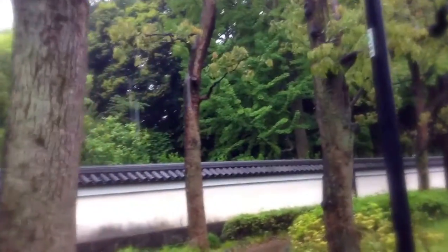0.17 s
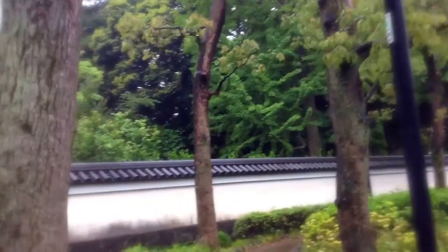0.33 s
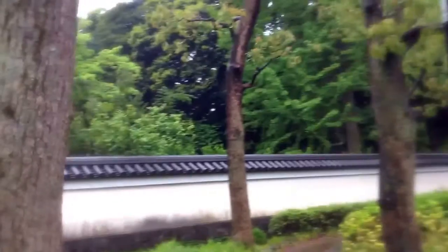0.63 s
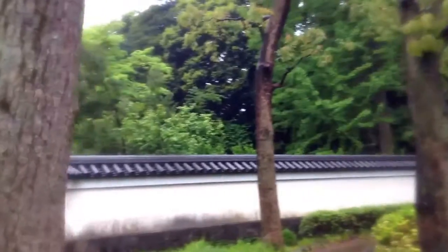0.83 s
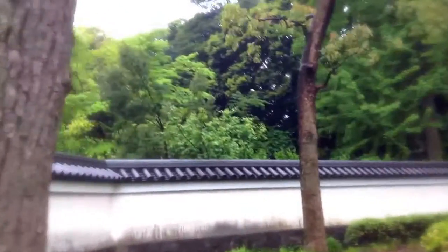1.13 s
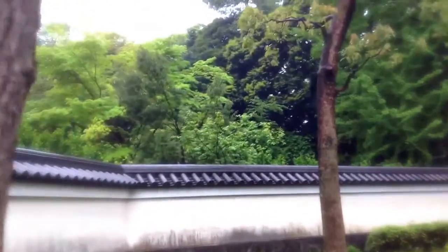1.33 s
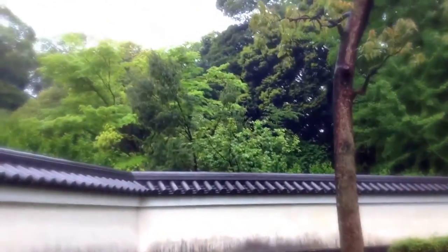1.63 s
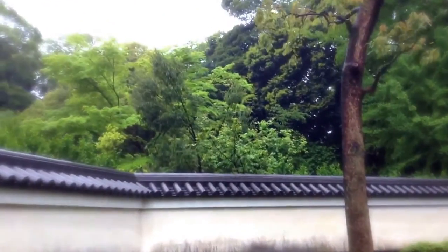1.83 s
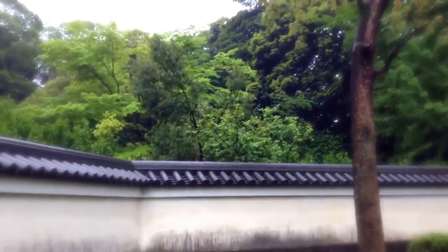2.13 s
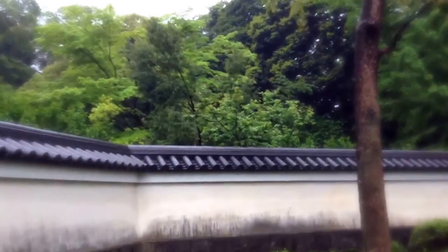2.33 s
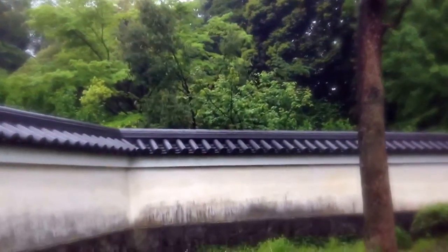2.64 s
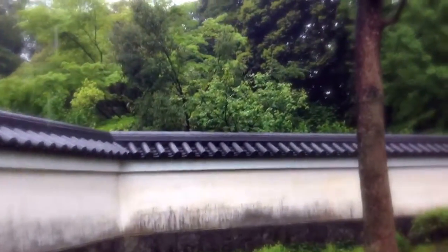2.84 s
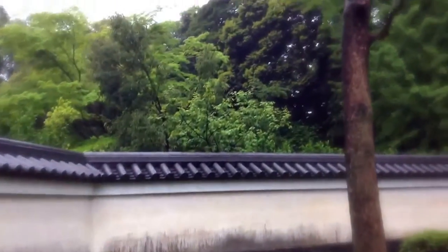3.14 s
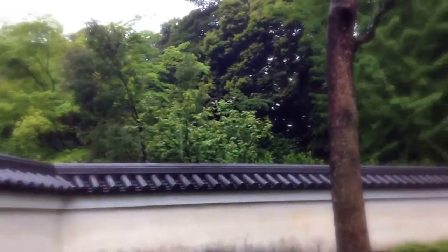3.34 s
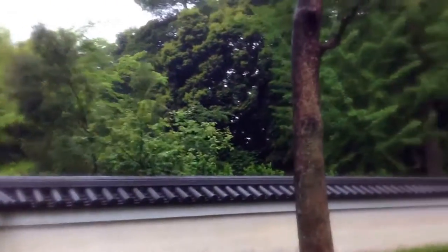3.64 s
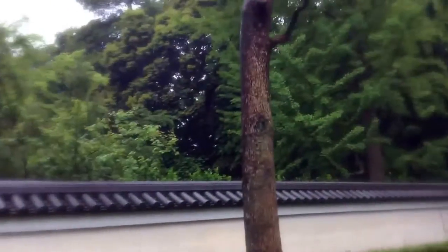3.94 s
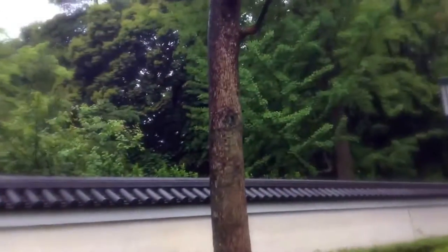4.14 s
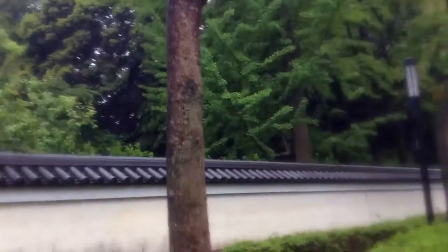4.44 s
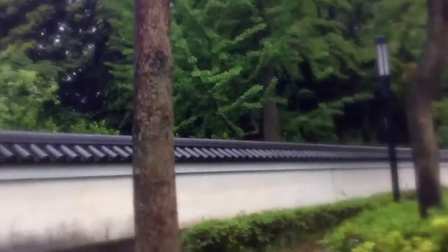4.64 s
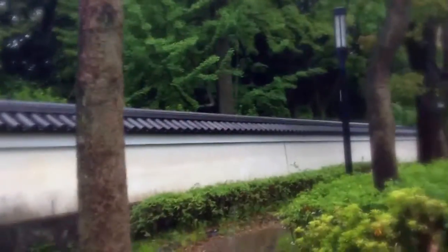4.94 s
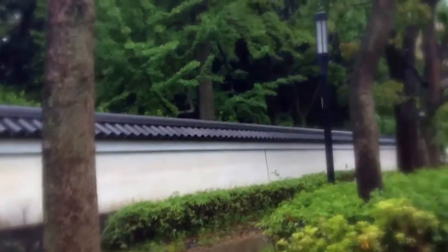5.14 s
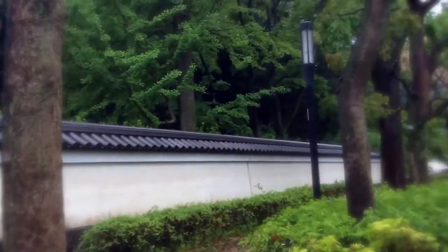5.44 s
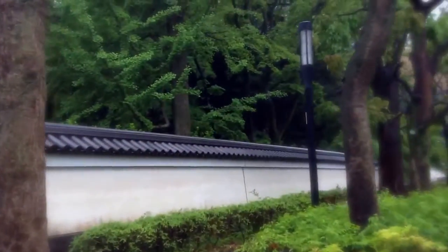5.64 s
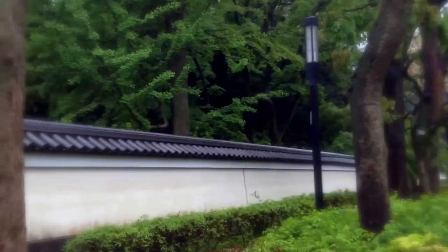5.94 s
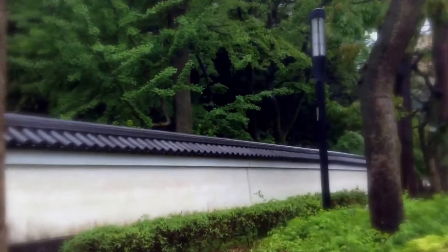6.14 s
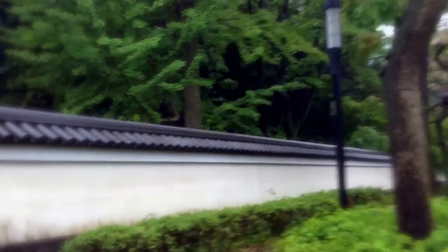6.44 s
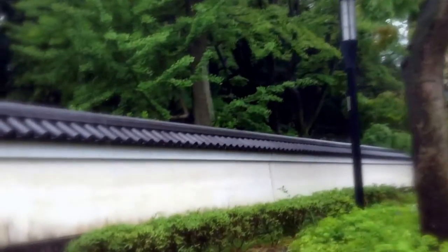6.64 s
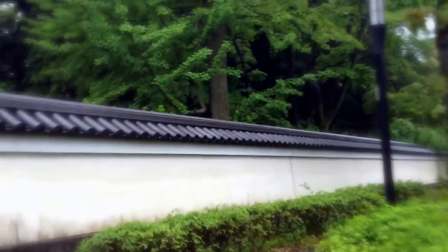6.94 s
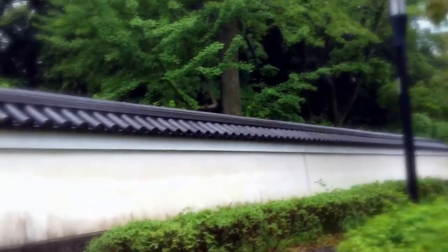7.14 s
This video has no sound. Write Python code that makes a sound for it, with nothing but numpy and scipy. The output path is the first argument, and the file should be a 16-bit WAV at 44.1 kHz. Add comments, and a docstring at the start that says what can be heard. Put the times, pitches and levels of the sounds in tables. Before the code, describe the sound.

Rain is already falling steadily at 0 s in a wooded garden, heard under an umbrella through a muffled, dark-sounding microphone. Low, slightly ringing cloth drumming sits beneath a soft midrange wash of distant plops and a quieter patter of ticks, splats and tiny plinks on leaves. A rounded bump thuds on the cloth near 0.55 s; faint bright splashes come around 0.75 and 1.1 s. The shower slowly builds, with softer bumps or drips near 2.5, 3.05 and 3.3 s. At 3.6 s a very loud, hard drip knocks right by the microphone, another at 3.93 s, and the rain ducks then creeps back. More knocks follow from 4.3 s, thickest from 5 to 6 s, uneven, hollow and clacking, with strong ones near 5.3, 5.5 and 5.86 s. The last falls about 6.02 s; fuller rain recovers and continues to 7.3 s, with one faint bump near 6.8 s.

```python
"""Steady rain in a wooded garden, heard through a muffled microphone from under an umbrella.
From the start drops drum on the ringing cloth, shaped noise and far plops make a wash, and short grains
and spray patter on leaves; soft bumps and bright splashes stand out, and the shower slowly builds.
Midway, fat drips knock right by the microphone, thickest between five and six seconds, each a push and
rebound through a resonant case; a limiter ducks the rain under them and slowly lets it back."""
import sys
import numpy as np
from scipy import signal
from scipy.fft import rfft
from scipy.io import wavfile
from scipy.ndimage import uniform_filter1d, minimum_filter1d

SR = 44100
rng = np.random.default_rng(int(sys.argv[2]) if len(sys.argv) > 2 else 0)


def unload_wav(signal):
    """Save mono or channel-first audio to the path in sys.argv[1] as 16-bit WAV at rate SR, clipped to [-1, 1]."""
    wavfile.write(
        sys.argv[1],
        SR,
        np.round(np.clip(np.atleast_2d(signal).T, -1, 1) * 32767).astype(np.int16),
    )


N = 321048
TIME = np.arange(N) / SR
LOW_HZ, HIGH_HZ = 300, 1500  # crossovers: umbrella below, wash between, leaves above


def amp(db):
    """Decibels to gain."""
    return 10 ** (np.asarray(db) / 20)


def unit(x):
    """Scales to rms 1."""
    return x / np.sqrt(np.mean(x ** 2) + 1e-20)


def read(points, hz):
    """Joins (f/Hz, value) points by straight lines on a log-frequency axis."""
    f, value = np.transpose(points)
    return np.interp(np.log(hz + 1), np.log(f + 1), value)


def level_curve(points):
    """Joins (t/s, level/dB) points by straight lines over the whole scene."""
    return np.interp(TIME, *np.transpose(points))


def add(mix, s, sound):
    """Mixes a sound in at time s."""
    part = mix[round(s * SR):][:len(sound)]
    part += sound[:len(part)]


def impacts(per_s, spread_db):
    """Random drop arrivals; a positive spread makes a few much larger, a negative one a few smaller."""
    size = amp(spread_db * np.minimum(rng.exponential(1, N), 4.5))
    landed = rng.random(N) < per_s / SR
    return size * rng.choice([-1, 1], N) * landed


# Spectral colour of the rain: [f/Hz, relative level per Hz/dB]
RAIN_COLOUR = [(25, -41), (45, -28.5), (80, -20), (120, -10), (165, -4.5), (240, -1.5), (340, -4),
               (430, -4.5), (700, -3), (1050, -6.5), (1600, -13), (2800, -25.5), (5000, -40.5), (9000, -57),
               (13000, -70.5)]


def rain_band(x, lo_hz, hi_hz, order=12):
    """Gives x the colour of the rain between two soft edges, at rms 1."""
    hz = np.fft.rfftfreq(N, 1 / SR) + 1
    power_share = 1 / (1 + (lo_hz / hz) ** order) / (1 + (hz / hi_hz) ** order)
    spectrum = rfft(x) * amp(read(RAIN_COLOUR, hz)) * np.sqrt(power_share)
    return unit(np.fft.irfft(spectrum, N))


def patchy_noise(patch_db, flicker_db):
    """Noise whose level drifts in small time-frequency patches and flickers across all pitches at once."""
    real, imag, patches = rng.standard_normal((3, N // 128 + 6, 257))
    patches = uniform_filter1d(patches, size=16, axis=0)  # smooth in time
    patches = unit(uniform_filter1d(patches, size=9, axis=1))  # smooth in pitch
    flicker = unit(uniform_filter1d(rng.standard_normal(len(real)), size=10))[:, None]
    field = (real + 1j * imag) * amp(patch_db * patches + flicker_db * flicker)
    return unit(signal.istft(field.T, nperseg=512, noverlap=384)[1][:N])


def grains(lo_hz, hi_hz, per_s, spread_db, cycles, count=20):
    """Drops of many sizes, each a few quickly dying cycles; roughly flat in spectrum overall."""
    out = np.zeros(N)
    for hz in np.geomspace(lo_hz, hi_hz, count):
        turns = np.arange(600) * hz / SR
        age = turns / cycles * np.pi
        grain = age ** 2 * np.exp(-age) * np.sin(2 * np.pi * turns)
        drops = signal.oaconvolve(impacts(per_s / count, spread_db), grain)[:N]
        out += np.sqrt(hz) * unit(drops)
    return unit(out)


def ping(hz, rise_s, order=3):
    """A few cycles under an envelope that swells to 1 over rise_s and dies away."""
    t = TIME[:SR // 16]
    return (t / rise_s * np.exp(1 - t / rise_s)) ** order * np.sin(2 * np.pi * hz * t)


# Strength of the shower, slowly building: [t/s, level/dB]
SHOWER = [(0, -4), (0.3, -3), (0.52, -3.5), (0.85, -1.8), (1.1, -1), (1.33, -3), (1.6, -1), (2.1, -1.2),
          (2.6, -1.7), (3.25, 0.9), (3.68, 0), (3.85, -0.5), (4.17, -1), (4.27, -3.5), (4.4, -0.5),
          (4.7, -1.5), (5.03, 1), (5.17, -2.5), (5.33, 0.3), (5.62, -1.5), (5.95, 1.3), (6.1, 2), (6.65, 3),
          (7.28, 0.7)]


def shower():
    """Strength of the shower in dB, which every layer of rain follows by its own amount."""
    return level_curve(SHOWER)


def surges(depth_db=0.36):
    """Quick random rises and falls in dB, shared by the wash and the leaves."""
    return depth_db * unit(uniform_filter1d(rng.standard_normal(N), size=SR // 25))


def wash(spatter, strength_db, surge_db, level_db=-29, plop_db=-6, spatter_db=-5):
    """Countless far drops merge into a soft roar; nearer ones plop and slap on wet ground."""
    roar = patchy_noise(patch_db=0.9, flicker_db=0.6)
    slaps = rain_band(roar + amp(spatter_db) * spatter, LOW_HZ, HIGH_HZ)
    plops = grains(351, 1687, per_s=900, spread_db=2.0, cycles=2.16, count=10)
    plops = rain_band(plops, LOW_HZ, HIGH_HZ)
    return amp(level_db + surge_db + strength_db) * unit(slaps + amp(plop_db) * plops)


def splats(per_s=170, spread_db=0.0, decay_s=0.002):
    """Drops burst on leaves, each into a very short spray of droplets, made as decaying noise."""
    decay = np.exp(-2 * TIME[:SR // 30] / decay_s)
    power = signal.oaconvolve(impacts(per_s, spread_db) ** 2, decay)[:N]
    return unit(np.sqrt(abs(power)) * rng.standard_normal(N))


# Ride on the leaf patter, on top of its share of the shower: [t/s, level/dB]
LEAF_RIDE = [(0.1, 4.5), (0.42, 1.1), (0.75, 3), (1.15, 4), (1.45, 2), (2.35, 2.5), (2.55, -0.3), (2.8, 1),
             (3.3, 0.5), (4.7, -1.7), (5.2, 0.5), (5.65, -3), (6.1, -1), (6.55, -0.6), (7.28, -1.5)]


def leaves(spatter, strength_db, surge_db, level_db=-41, follow=0.7,  # follow: dB per dB of shower
           tick_db=-2.5, spatter_db=-3, plink_db=-10.5, splat_db=-2.0, splat_top_hz=5000):
    """Separate ticks, slaps and splats on near leaves and small plinks in puddles, over the hiss of the trees."""
    hiss = patchy_noise(patch_db=2.0, flicker_db=0.3)
    slaps = rain_band(hiss + amp(spatter_db) * spatter, HIGH_HZ, SR)
    bursts = rain_band(splats(), 1400, splat_top_hz, order=6)
    ticks = grains(1404, 13000, per_s=3200, spread_db=1.0, cycles=1.75)
    plinks = grains(1304, 6960, per_s=300, spread_db=1.5, cycles=8.5, count=40)
    drops = rain_band(amp(tick_db) * ticks + amp(plink_db) * plinks, HIGH_HZ, SR)
    gain = amp(level_db + surge_db + follow * strength_db + level_curve(LEAF_RIDE))
    return gain * unit(slaps + amp(splat_db) * bursts + drops)


# Modes of the taut cloth: [f/Hz, width/Hz, level/dB]
CLOTH_MODES = [(160.2, 24, 3.5), (192.3, 28, 2.8), (243, 33, 0)]
# Ride on the drumming, on top of its share of the shower: [t/s, level/dB]
DRUM_RIDE = [(0, 0), (0.55, 0), (0.95, -0.5), (2.2, 0), (2.8, 2), (3.3, 1.5), (4.35, 0), (4.95, 1.8),
             (5.6, -3), (6.2, 3), (6.6, -1.1), (7.28, 2.5)]


def umbrella(strength_db, level_db=-31.5, follow=0.79,  # follow: dB per dB of shower
             per_s=450, panel_db=-3.5, slack_db=-3.0):
    """Fine rain drums the cloth: dull pushes from the drops, and a short ring of the panels."""
    t = TIME[:SR // 8]
    ring = np.zeros(len(t))
    for hz, width, db in CLOTH_MODES:
        decay = np.sqrt(width) * np.exp(-np.pi * width * t)  # equal energy at any width
        ring += amp(db) * decay * np.sin(2 * np.pi * hz * t)
    hits = impacts(per_s, spread_db=-0.5)
    panels = rain_band(signal.oaconvolve(hits, ring)[:N], 0.95, LOW_HZ)
    pushes = rain_band(impacts(1600, spread_db=3.5), 0.95, LOW_HZ)
    gain = amp(level_db + follow * strength_db + level_curve(DRUM_RIDE))
    return gain * unit(amp(panel_db) * panels + amp(slack_db) * pushes)


# Soft bumps on the umbrella: [t/s, envelope peak level/dB, f/Hz, swell/s]
BUMPS = [(0.034, -23, 160, 0.0076), (0.365, -26.5, 148, 0.011), (0.392, -25, 443, 0.01),
         (0.538, -19, 150, .0052), (0.551, -12, 205, 0.0049), (2.497, -18, 180, .0052),
         (3.053, -18.5, 202, 0.0063), (6.773, -24.5, 196, 0.014)]


def bumps(out):
    """Single soft bumps on the cloth, each a swelling low ping."""
    for s, db, hz, rise_s in BUMPS:
        add(out, s, amp(db) * ping(hz, rise_s))


def flurry(length_s, hz, per_s=1500):
    """Many small drops land on the cloth together, swelling and thinning out."""
    patter = rain_band(impacts(per_s, spread_db=-1.0), hz / 2, hz * 2, order=6)
    swell = np.sqrt(np.hanning(round(length_s * SR)))
    return swell * patter[:len(swell)]


# Flurries of drops shaken onto the cloth: [t/s, length/s, level/dB, middle f/Hz]
FLURRIES = [(0.34, 0.12, -31, 260), (3.897, 0.054, -26, 790), (4.482, 0.089, -28.5, 750),
            (5.242, 0.056, -31.5, 1000)]


def flurries(out):
    """Short swells of dense drops, each in a band around its own pitch."""
    for s, length_s, db, hz in FLURRIES:
        add(out, s, amp(db) * flurry(length_s, hz))


def splash(hz, cycles=0.83, spray_db=-20, spray_s=0.0018):
    """One bright tick and the fine spray that follows it; peak 1."""
    t = TIME[:SR // 50]
    droplets = amp(spray_db) * rng.standard_normal(len(t)) * np.exp(-t / spray_s)
    droplets[0] = 1
    sound = signal.fftconvolve(droplets, ping(hz, cycles / hz))
    return sound / abs(sound).max()


# Sharp splashes on the nearest leaves: [t/s, peak level/dB, f/Hz]
SPLASHES = [(0.754, -41, 4500), (1.103, -39, 4500), (1.157, -41, 5500), (2.79, -50, 8000),
            (3.913, -48, 8500), (3.922, -31, 2280), (4.071, -59, 10500), (4.083, -48, 5400),
            (4.177, -46, 7300), (4.259, -34, 3030), (4.526, -29, 2090), (5.075, -39, 5200),
            (5.076, -19, 1480), (5.119, -32, 3270), (7.024, -56, 9000)]


def splashes(out):
    """Single drops break on the nearest leaves with a tick and spray."""
    for s, db, hz in SPLASHES:
        add(out, s, amp(db) * splash(hz))


# Colour of a drip's knock, before size and brightness: [f/Hz, level/dB]
KNOCK_COLOUR = [(50, -20.5), (110, -21.5), (200, 0.5), (360, -1), (800, -8), (1500, -20.5), (3000, -34),
                (4500, -49), (8500, -67), (14000, -97)]
# Resonances of the case that the drips strike: [f/Hz, width/Hz, lift/dB]
CASE_MODES = [(483, 43, 3.5), (750, 140, 3.5), (920, 130, 4), (1860, 410, 5), (2970, 350, 5),
              (3530, 420, 7.5), (5360, 650, 7.5), (7440, 1100, 4)]


def knock(size, bright_db, shell_db, shell_hz, spot_hz, rebound_s, tip_db, rebound=0.75,
          rattle_db=-31, rattle_s=0.012, spot_db=8, spot_q=9, shell_s=0.0017, count=4096):
    """A sharp push, its rebound and a brief scatter of spray, through a damped case; peak 1 before the shell."""
    hz, t = abs(np.fft.fftfreq(count, 1 / SR)), TIME[:count]
    colour_db = read(KNOCK_COLOUR, hz * size)  # a larger size moves the colour down in pitch
    colour_db += bright_db * np.log2(np.clip(hz, 200, 4000))
    colour_db += tip_db * np.clip((hz - 4000) / 5000, 0, 1)  # a harder first contact lifts only the top treble
    modes = [*CASE_MODES, (spot_hz, spot_hz / spot_q, spot_db)]  # each spot adds a clack of its own
    for mode_hz, width, db in modes:
        colour_db += db / (1 + (2 * (hz - mode_hz) / width) ** 2)
    log_spectrum = np.conj(signal.hilbert(np.log(amp(colour_db))))  # minimum phase: the ring follows the push
    body = np.fft.ifft(np.exp(log_spectrum)).real
    blow = amp(rattle_db) * rng.standard_normal(count) * np.exp(-t / rattle_s) * (t > .0014)
    blow[0] += 1
    blow[round(rebound_s * SR)] -= rebound  # share of the first push; cuts a row of notches
    sound = signal.fftconvolve(blow, body)[:count]
    # the hollow shell answers a moment later with a cycle or two
    shell = t / shell_s * np.exp(1 - t / shell_s) * np.sin(2 * np.pi * shell_hz * t)
    return sound / abs(sound[t < .0014]).max() - amp(shell_db) * shell


# Fat drips: [t/s, level/dB, size factor, brightness/dB per octave, hollow ring level/dB relative to the knock,
#             hollow ring f/Hz, struck spot f/Hz, rebound delay/s, snap of the tip/dB]
DRIPS = [(2.532, -15, 1, -2, -21, 450, 445, 0.0006, 0), (3.323, -13, 1.1, 1.5, -13, 350, 2200, 0.00057, 7),
         (3.6075, 6, 1.25, 1.5, -20, 367, 3600, 0.00055, 0),
         (3.9332, 2, 0.88, -2, -17, 300, 3600, 0.00057, -2),
         (4.334, -17, 0.73, -1.5, -18, 370, 2900, 0.00047, 2),
         (4.5413, -8.5, 0.83, -2.5, -10, 500, 1900, 0.00061, 4),
         (4.637, -6.5, 1.12, 3, -23, 310, 7400, 0.0004, 6.5),
         (4.9231, -11.5, 0.74, -3.5, -4, 398, 990, .0006, -3),
         (5.0945, -12.5, 1.04, 2, -15, 423, 1920, .0006, -2),
         (5.2972, 3, 0.8, -2.4, -21, 740, 1890, 0.00065, 6),
         (5.4412, -3, 0.67, -2.5, -6.5, 340, 1690, 0.00055, 2),
         (5.4987, -10.5, 0.88, 1.5, -3, 298, 1600, .00054, 7),
         (5.5086, -2, 1.14, -1.5, -7, 354, 2930, .00042, 6),
         (5.5597, -6.5, 1.4, 2.5, -9, 695, 2580, 0.00064, 14),
         (5.5738, -9, 1.5, 3, -11, 400, 2820, 0.00061, 2),
         (5.7334, -7.5, 1.03, -0.5, -17.5, 340, 3260, 0.00061, 4),
         (5.7567, -4.5, 0.71, -2, -5.5, 326, 1045, 0.00052, 4),
         (5.7806, -7.5, .7, -4.5, -16, 420, 1300, 0.00041, 3),
         (5.8585, -1, .64, -6.5, -7.5, 510, 4100, 0.00053, 4),
         (6.0174, -8, 1.07, 0.8, -13, 466, 1500, 0.00038, 4)]


def drips(out):
    """Fat drips strike right by the microphone, each with its own size, spot and rebound."""
    for s, db, *shape in DRIPS:
        add(out, s, amp(db) * knock(*shape))


def near_drops():
    """Single drops that stand out from the rain, from soft bumps up to the loud knocks."""
    out = np.zeros(N)
    bumps(out)
    flurries(out)
    splashes(out)
    drips(out)
    return out


def scene():
    """Three layers of rain follow the one shower, each by its own amount; the near drops land on top."""
    strength_db, surge_db = shower(), surges()
    spatter = unit(impacts(per_s=1100, spread_db=2.5))  # toneless slaps, heard from the middle up to the treble
    far = wash(spatter, strength_db, surge_db)
    near = leaves(spatter, strength_db, surge_db)
    return (far + near + umbrella(strength_db) + near_drops())[None]


def record(dry, ceiling_db=-11.5, sense_hz=850, recover_s=0.26, low_cut_hz=42, edge_hz=14400):
    """A limiter, keenest on sharp edges, clamps at once and recovers ever slower; then the band limits."""
    slope = abs(np.gradient(dry[0])) * SR / (2 * np.pi * sense_hz)
    over_db = np.maximum(20 * np.log10(slope + 1e-9) - ceiling_db, 0)
    release = np.exp(-TIME / recover_s)
    duck_db = np.maximum.accumulate(over_db / release) * release
    held_db = minimum_filter1d(-duck_db, size=45)  # looks half a millisecond ahead
    gain_db = uniform_filter1d(held_db, size=31)
    fade_in = np.minimum(TIME / .002, 1)
    limited = dry * amp(gain_db) * fade_in
    low_cut = signal.butter(2, low_cut_hz, "highpass", fs=SR, output="sos")
    low_pass = signal.firwin(255, edge_hz, window=("kaiser", 8), fs=SR)
    return signal.oaconvolve(signal.sosfilt(low_cut, limited), low_pass[None], "same")


dry = scene()
out = record(dry)
unload_wav(out)
```